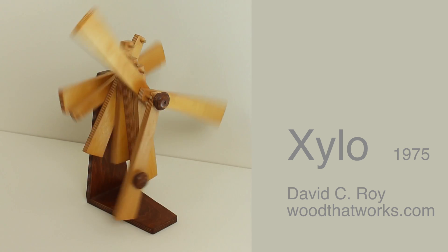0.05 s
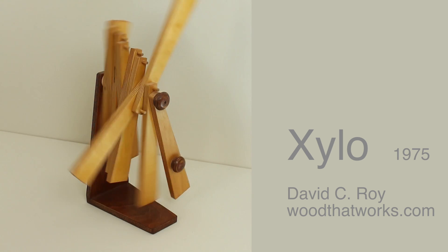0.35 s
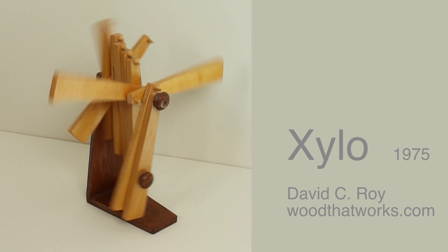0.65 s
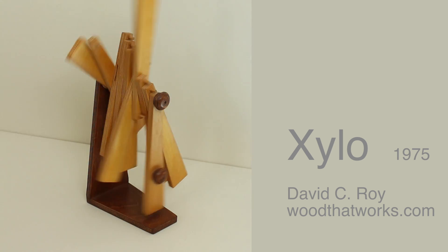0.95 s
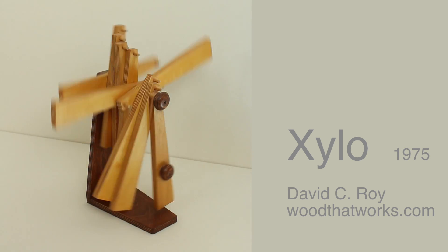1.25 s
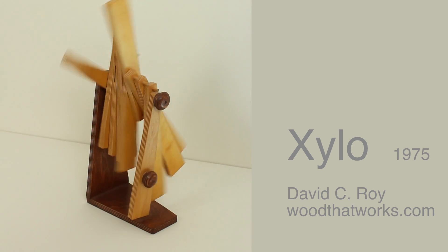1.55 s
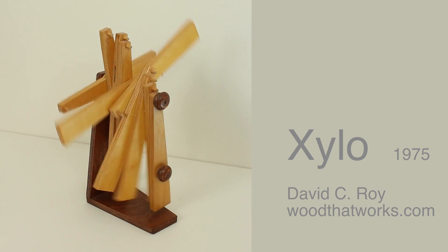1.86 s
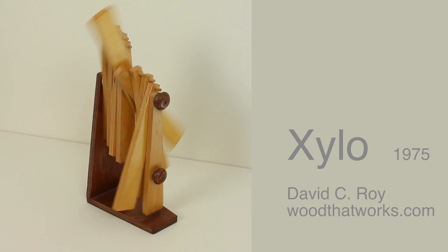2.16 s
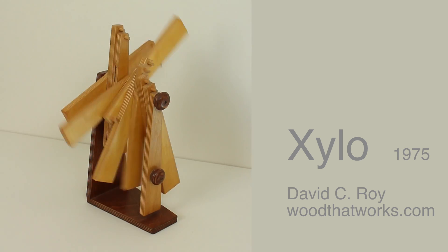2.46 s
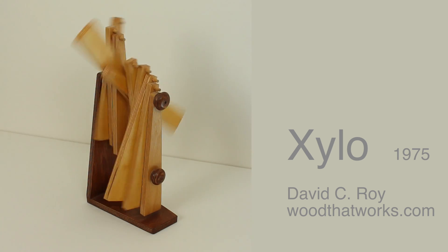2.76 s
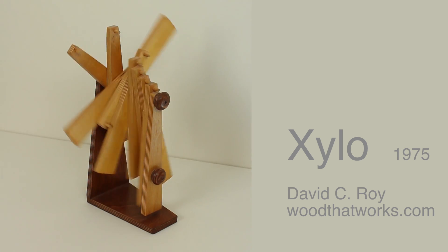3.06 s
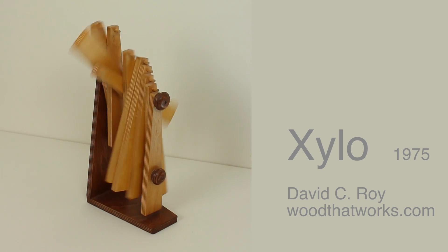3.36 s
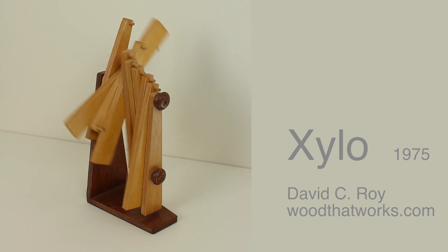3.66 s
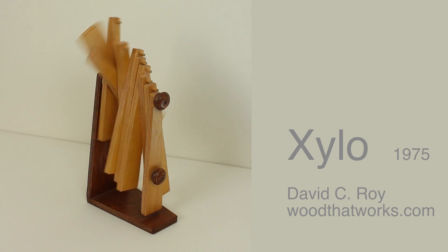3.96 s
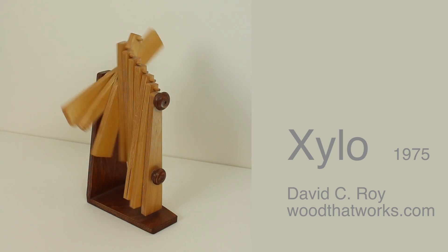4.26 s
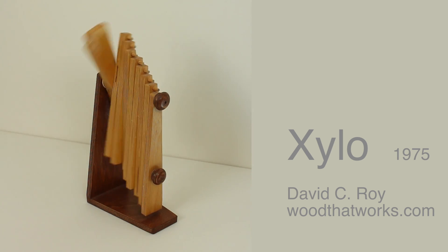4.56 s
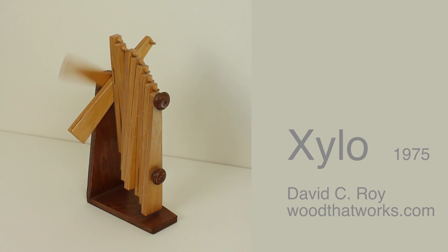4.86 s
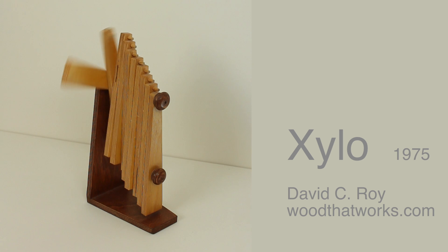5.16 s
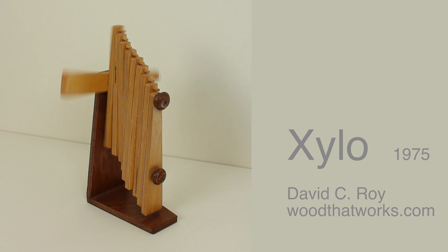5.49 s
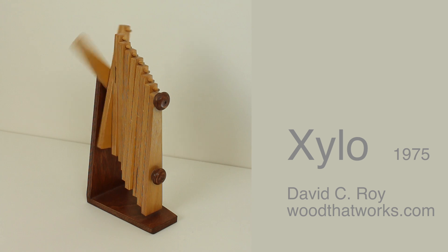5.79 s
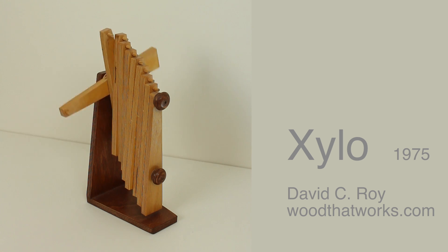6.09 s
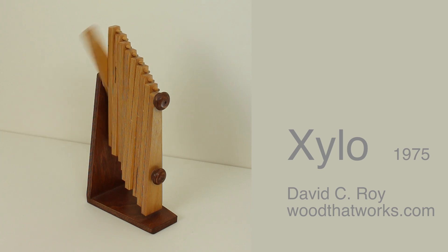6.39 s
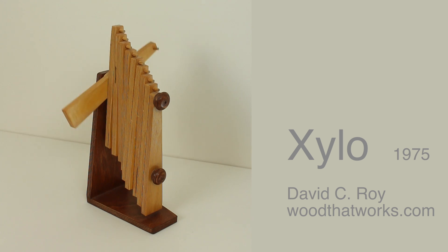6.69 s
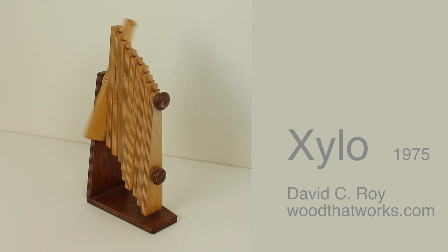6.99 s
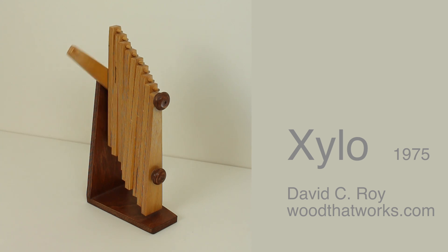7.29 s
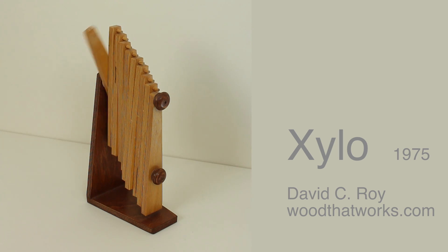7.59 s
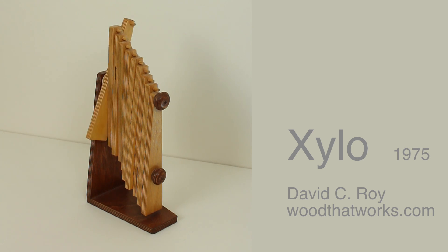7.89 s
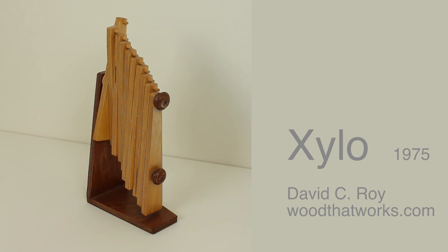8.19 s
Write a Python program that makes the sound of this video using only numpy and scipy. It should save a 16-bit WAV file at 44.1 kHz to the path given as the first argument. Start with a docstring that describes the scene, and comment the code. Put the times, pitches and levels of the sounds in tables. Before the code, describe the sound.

A brief low rumble and a sharp wooden clack sound at the start, as the slats of a desk toy swing on one axle. Hard, dry clacks follow unevenly, some doubled, at about 0.9, 1.0, 1.6, 2.2, 2.8, 3.5, 4.0 and 4.2 seconds, with a short woody ring and a small thump from the stand. Between them the slats tick lightly and rub past each other with brief, dry scrapes. A faint friction drone from the axle swells and fades between about 2.5 and 4 seconds. The last hard clack lands at 5.3 seconds. After that only small clusters of soft ticks and rubbing remain, near 5.7, 6.5, 7.1 and 7.7 seconds, getting weaker until the toy is almost still at around 8 seconds. The sound is close, in a small quiet room with short reverberation and a faint, steady ventilation hum.

```python
"""A brief low rumble and a sharp clack: a wooden desk toy is going, a row of slats swinging on one axle.
Each slat catches its neighbour, and the impact excites the damped modes of the wood and of the stand.
Between clacks the slats tick and rub by stick-slip friction, and for a while one drones on the axle.
One by one they come to rest, until the last only ticks.
A small quiet room reverberates, with a faint ventilation hum."""
import sys
import numpy as np
from scipy import signal
from scipy.fft import rfft, irfft, next_fast_len
from scipy.io import wavfile
from scipy.ndimage import uniform_filter1d, map_coordinates

SR = 44100
rng = np.random.default_rng(int(sys.argv[2]) if len(sys.argv) > 2 else 0)


def wav_out(sig):
    """Save sig, one row per channel (or a flat mono array), as 16-bit PCM at SR to the path in sys.argv[1]."""
    wavfile.write(sys.argv[1], SR, np.round(np.clip(np.atleast_2d(sig).T, -1, 1) * 32767).astype(np.int16))


N = 367794
CLOCK = np.arange(N) / SR
AGE = np.arange(SR // 4) / SR  # time since a contact

# Noise spectra: f/Hz, relative spectral density/dB
AIR_SPECTRUM = [(12, -27.5), (20, -10), (44, -6.5), (75, -20), (118, -9.5), (157, -8), (268, -12.5),
                (366, -8.5), (398, -7.5), (721, -15), (830, -9.5), (1540, -21.5), (2050, -25.5),
                (15600, -33), (17000, -46)]  # room air
HISS_SPECTRUM = [(400, 4), (1000, 8), (3000, 2), (7000, -8), (12000, -4), (16500, -13)]  # fast, smooth rubbing
SLIDE_SPECTRUM = [(710, -46), (1200, -18), (1580, -10.5), (1820, -15), (2270, -8.5), (2590, -13.5),
                  (3400, -18), (3840, -7.5), (4990, -13.5), (5700, -13.5), (8730, -25.5), (14600, -33),
                  (16500, -32)]  # dry sliding
WOOD_SPECTRUM = [(300, -68.5), (600, -12), (1050, 2), (1300, 0), (1650, 4.5), (2200, 2), (2800, 3.5),
                 (3300, -1), (4100, 4.5), (5200, -3), (7000, -7.5), (10000, -22.5)]  # dense, short-lived modes
CRACK_SPECTRUM = [(2500, -40.5), (5000, -7), (6400, -3), (7000, -4.5), (7600, 0), (8500, -8), (9800, 3),
                  (10500, -4), (11500, 4), (12200, -1), (13300, -0.5), (16500, -9)]  # contact noise
# Hum lines: f/Hz, level/dB, wavering/dB
HUM_LINES = [(127.2, -68.5, 0), (411, -69, 3.5), (880, -93, 2.5), (15735, -97.5, -0.5)]
# Reverberation time: f/Hz, T60/s
ROOM_DECAY = [(130, 0.48), (400, 0.26), (1000, 0.44), (2200, 0.52), (6000, 0.47), (15000, 0.31)]
# Build-up of the room modes, slowest in the bass: f/Hz, time constant/s
ROOM_BUILD_UP = [(150, 0.0365), (400, 0.0088), (1500, 0.0027)]
# Colour of the reverberation: f/Hz, relative level/dB
ROOM_COLOUR = [(70, -41.5), (150, -10.5), (300, -13.5), (700, -7.5), (2200, -14), (5000, -18), (14000, -22)]
# Normal modes: f/Hz, bandwidth/Hz, relative level/dB
STAND_MODES = [(145.8, 9.1, -12), (211, 34, -7.5), (320.5, 36.4, -4), (369, 13, -13), (404, 15, -3.5),
               (540, 60, 0.5), (656.4, 41, -4), (804, 99, 5.5), (1045, 170, 7)]  # the stand on its table
SLAT_MODES = [(1585, 47, -8), (1707, 31, -12), (1991, 22, -6.5), (2079, 21, -10), (2245, 10, -14.5),
              (2304, 34, -5), (3032, 82, -4.5), (3907, 150, 1.5), (4350, 145, -14.5), (4670, 30.6, -14.5),
              (5630, 260, 5), (6433, 130, -4), (7820, 320, -0.5), (13700, 440, -19)]  # bending of the slats
# Vigour of the swinging: t/s, relative level/dB
SWING_VIGOUR = [(0, 2.5), (0.6, -3), (1.1, -1.5), (1.7, -3), (2.15, 2), (2.45, -5), (4.3, -3.5),
                (5.9, -7.5), (6.7, -13), (8.3, -15.5)]
# One slat slides past its neighbour: t/s, duration/s, relative level/dB
SLAT_PASSES = [(0.32, .05, -49), (0.41, .07, -47), (0.7, .04, -58.5), (1.22, .08, -54), (1.33, .15, -48.5),
               (2.03, .11, -46), (2.52, .08, -48), (2.66, .16, -46), (3.17, .26, -46), (3.77, .1, -60),
               (3.958, 0.051, -40.5), (4.63, .11, -46.5), (4.95, .05, -53), (5.09, .1, -51),
               (5.65, .11, -65.5), (6.38, .18, -56), (6.97, .23, -54), (7.7, .15, -55)]
# Short dry scrapes: t/s, duration/s, centre f/Hz, level/dB
DRY_SCRAPES = [(1.224, 0.032, 2830, -47.5), (1.367, 0.02, 3000, -42.5), (1.403, 0.011, 13100, -51),
               (1.42, 0.0092, 12700, -46), (1.466, 0.0084, 3600, -42), (3.197, 0.034, 13200, -57),
               (5.684, .024, 13200, -54), (6.968, 0.019, 2650, -58.5)]
# Light touches: t/s, overall gain/dB, extra crack gain/dB, favoured mode f/Hz
LIGHT_TOUCHES = [(0.2024, -33.5, -24, 2090), (0.3352, -30.5, -9.5, 2260), (0.3494, -31.5, -14.5, 3020),
                 (0.3635, -29.5, -7, 3100), (0.4364, -36.5, -8, 2240), (0.7106, -30.5, -8, 2100),
                 (0.7204, -29, -9.5, 3860), (0.7262, -27, -22, 2160), (0.8056, -33, -5.5, 2010),
                 (0.8114, -31, -12.5, 2290), (1.2457, -38.5, -9, 2230), (1.279, -37, -6, 3220),
                 (1.292, -42, -13, 3280), (1.3702, -30, -13, 3050), (1.4037, -32.5, -10, 2280),
                 (1.4224, -34.5, -7, 1976), (1.4664, -36.5, -5, 1940), (2.1043, -38.5, -13, 1520),
                 (2.179, -32.5, -11, 2430), (2.529, -37, -20.5, 2220), (2.5701, -37.5, -21, 2220),
                 (2.9454, -39, 10, 2020), (3.0367, -42, -22.5, 1980), (3.204, -37, -10, 2222),
                 (3.8187, -44, -16.5, 2180), (3.984, -39, -19.5, 2360), (4.637, -32, -3, 2255),
                 (4.6395, -30.5, -11, 3020), (4.675, -38, -22, 5700), (4.6917, -33.5, 1, 2220),
                 (4.9785, -38.5, -8, 3960), (4.9904, -34, -6.5, 2170), (5.0876, -32.5, -12.5, 1980),
                 (5.0996, -33.5, -13, 3100), (5.136, -36.5, -19, 2260), (5.1642, -38, -17.5, 2210),
                 (5.1804, -34, -15, 2340), (5.6346, -39, -4, 2280), (5.6845, -31, -5, 3960),
                 (5.746, -35, -13, 3040), (6.408, -35, -12, 1935), (6.4702, -44.5, -7, 2170),
                 (6.4885, -31, -19, 1980), (6.5146, -32.5, -11.5, 3040), (6.52, -31, -20, 3960),
                 (7.028, -41, -16, 2050), (7.0374, -38, -18, 1600), (7.1052, -41, -10, 1910),
                 (7.1797, -42.5, -5.5, 1920), (7.6937, -42.5, -15.5, 1920), (7.7812, -38.5, -19, 1950)]
# Hard catches: t/s, overall gain/dB, favoured mode f/Hz, its gain/dB, thump gain/dB, thump f/Hz,
# crack gain/dB, long ring gain/dB; the gains of the parts add to the overall gain
HARD_CATCHES = [(0.1315, -19.5, 4910, -15, -17.5, 248, -11.5, -36),
                (0.8732, -22.5, 3590, -6, -35, 200, -7.5, -28.5),
                (0.8776, -16, 1665, -8.5, -24.5, 139, -26, -39),
                (0.988, -14, 2575, -13.5, -22.5, 205, -2, -15.5),
                (1.5524, -18.5, 2060, -14, -16, 296, -8, -15.5),
                (1.558, -26, 1012, -7.5, -4, 696, -25, -30), (1.6657, -29, 2290, -11, -29, 600, -19.5, -38),
                (2.2006, -21, 2250, -8, -13, 190, -1.5, -38), (2.2031, -18.5, 2050, -10, -16, 640, -6, -44),
                (2.212, -19.5, 2020, -8, -13.5, 597, -22, -39),
                (2.3255, -35, 2060, -20, -2.5, 190, -10, -27),
                (2.8369, -17.5, 2050, -9, -10.5, 180, -3.5, -31),
                (2.848, -21, 1740, -15, -13.5, 600, -9, -39), (3.2857, -36.5, 1900, -13, -3, 517, -28, -14),
                (3.4531, -15.5, 3900, -8, -14, 238, -4, -25),
                (4.0213, -14, 1997, -16.5, -15.5, 410, -2, -36),
                (4.228, -22, 1914, -11.5, -5, 256, -2, -45), (4.25, -39, 1960, -1, 8.5, 300, -16, -32),
                (5.266, -15, 2020, -12, -24, 304, -1, -27.5)]

TOP_HZ = 16900  # upper band limit


def amp(db):
    """Amplitude ratio of a level in decibels."""
    return 10 ** (np.asarray(db) / 20)


def unit(x):
    """Normalisation to rms 1."""
    return x / np.sqrt(np.mean(x ** 2) + 1e-20)


def blow(x):
    """Normalisation to the energy of 5 ms at rms 1."""
    return x * np.sqrt(.005 * SR / np.sum(x ** 2))


def along(points, hz):
    """Interpolation of (f/Hz, value) points on a logarithmic frequency axis."""
    f, values = np.transpose(points)
    return np.interp(np.log(hz + 1), np.log(f), values)


def filtered(x, response):
    """Linear filtering: the spectrum of x is multiplied by a frequency response."""
    size = next_fast_len(len(x) + 8192)
    return irfft(rfft(x, size) * response(np.fft.rfftfreq(size, 1 / SR)), size)[:len(x)]


def noise(spectrum, size):
    """Spectral shaping: coloured noise of rms 1."""
    return unit(filtered(rng.standard_normal(size), lambda hz: amp(along(spectrum, hz))))


def band(centre_hz, half_width_hz, size):
    """Resonance: noise of rms 1 in a single peak."""
    peak = lambda hz: 1 / (1 + ((hz - centre_hz) / half_width_hz) ** 2)
    return unit(filtered(rng.standard_normal(size), peak))


def wobble(knots_per_s):
    """Random modulation: a smooth curve through Gaussian knots."""
    knots = rng.standard_normal(int(N * knots_per_s / SR) + 4)
    return map_coordinates(knots, [np.arange(N) * knots_per_s / SR])


def add(track, s, sound):
    """Superposition of a sound on the track from time s."""
    part = track[max(round(s * SR), 0):][:len(sound)]
    part += sound[:len(part)]


def ring(modes, rise, detune, scatter_db):
    """Free vibration of damped modes; pitches and strengths vary with the slat and point of contact."""
    hz, width, db = np.transpose(modes)[:, :, None]
    pitch, size, phase = rng.standard_normal((3, len(modes), 1))
    waves = np.sin(2 * np.pi * (hz * (1 + detune * pitch) * AGE + phase)) * np.exp(-np.pi * width * AGE)
    return blow(np.sum(amp(db + scatter_db * size) * waves, axis=0) * (1 - np.exp(-AGE / rise)))


def burst(spectrum, rise, hold, t60, edge_hz=TOP_HZ):
    """Modal overlap: countless modes merge into noise, fed while the faces chatter, then decaying."""
    fade = amp(-60 * np.maximum(AGE - hold, 0) / t60)
    colour = lambda hz: amp(along(spectrum, hz)) / (1 + (hz / edge_hz) ** 20)
    return blow(filtered(rng.standard_normal(len(AGE)), colour) * fade * (1 - np.exp(-AGE / rise)))


def ventilation():
    """Broadband air noise and hum lines, which waver by amplitude and phase modulation."""
    hum = np.zeros(N)
    for hz, db, waver_db in HUM_LINES:
        strength = amp(waver_db * wobble(6.4))
        hum += amp(db) * unit(strength * np.sin(2 * np.pi * hz * CLOCK + 1.3 * wobble(5.7)))
    return hum + amp(-59.5) * noise(AIR_SPECTRUM, N)


def room(x, wall_delay_s=.047, wall_db=-2):
    """Reverberation: a diffuse field builds up and decays; the far wall reflects a second wave of it."""
    hz, t, field = signal.stft(rng.standard_normal(SR * 3 // 5), SR, nperseg=256)
    decay = amp(-60 * t / along(ROOM_DECAY, hz)[:, None])
    build_up = 1 - np.exp(-t / along(ROOM_BUILD_UP, hz)[:, None])
    envelope = decay * build_up * (1 + amp(wall_db) * (t > wall_delay_s))
    envelope /= np.sqrt(np.mean(envelope ** 2, axis=1, keepdims=True))
    tail = signal.istft(field * envelope * amp(along(ROOM_COLOUR, hz))[:, None], SR, nperseg=256)[1]
    return signal.fftconvolve(x, tail / np.sqrt(len(tail)))


def swing(exponent=1):
    """Power law: a gain that follows the vigour of the swinging."""
    s, db = np.transpose(SWING_VIGOUR)
    return amp(exponent * np.interp(CLOCK, s, db))


def shaking(rise_s=0.01, fall_db_per_s=57.5):
    """Energy summation: the envelope of the decaying vibration that the clacks leave in the toy."""
    power, t = np.zeros(N), CLOCK[:SR]
    shape = (1 - np.exp(-t / rise_s)) * amp(-fall_db_per_s * t)
    for s, db, *_ in HARD_CATCHES:
        add(power, s, (amp(db) * shape) ** 2)
    return np.sqrt(power)


def stand_rumble():
    """Forced vibration: the rolling axle, the clacks and the first push drive the stand's modes."""
    resonances = lambda f: sum(amp(db) / (1 + ((f - hz) / width) ** 2) for hz, width, db in STAND_MODES)
    tilt = lambda f: amp(along([(60, -0.5), (150, 17.5), (400, 8), (1000, -13.0)], f))
    rumble = unit(filtered(rng.standard_normal(N), lambda f: resonances(f) * tilt(f)))
    rolling = amp(-55) * swing(exponent=0.62)
    shaken = amp(-28.5) * shaking()
    first_push = amp(-42 - 80 * CLOCK)  # decays at 80 dB/s
    return amp(-4.5) * np.linalg.norm([rolling, shaken, first_push], axis=0) * rumble


def stand_bump(s=1.935, db=-45):
    """Damped low modes: one dull bump of the stand on its table."""
    out = np.zeros(N)
    low_modes = [(68.5, 17, -5), (104, 27, -3), (187, 21, 3.5)]
    add(out, s, amp(db) * ring(low_modes, rise=.005, detune=.01, scatter_db=5))
    return out


def axle_drone(start_s=2.45, end_s=3.97, drone_hz=965, width_hz=70, sag_hz_per_s=35):
    """Friction at the pivot excites a narrow resonance that swells, sags and fades as a slat slows."""
    age = np.clip(CLOCK - start_s, 0, end_s - start_s)
    swell = np.sqrt(np.abs(np.sin(np.pi * age / (end_s - start_s))))
    phase = 2 * np.pi * np.cumsum(drone_hz - sag_hz_per_s * age) / SR
    narrow_noise = wobble(2 * width_hz) * np.sin(phase) + wobble(2 * width_hz) * np.cos(phase)
    return amp(-57.5) * swell * unit(narrow_noise)


def passing(rise_s=0.004, fall_s=0.039):
    """Sliding contact: the gain of the friction rises, holds and falls as two faces meet and part."""
    gain, t = np.zeros(N), CLOCK[:SR]
    for s, length, db in SLAT_PASSES:
        add(gain, s, amp(db) * (1 - np.exp(-t / rise_s)) * np.exp(-np.maximum(t - length, 0) / fall_s))
    return gain


def impulses(per_s, spread_db, size):
    """Poisson process: impulses at random times, with log-normal strengths."""
    return (rng.random(size) < per_s / SR) * amp(spread_db * rng.standard_normal(size))


def grit(t60=0.015):
    """Shot noise: sparse snags of the grain, each a short rasp with a bright top."""
    snags = impulses(per_s=110, spread_db=8, size=N)
    flicker = signal.lfilter([1], [1, -np.exp(-np.log(1000) / (t60 * SR))], snags)
    bright_rasp = noise(SLIDE_SPECTRUM, N) + band(centre_hz=13200, half_width_hz=1900, size=N)
    return amp(-13.5) * unit(flicker * bright_rasp)


def rubbing(grip_db=3.0):
    """Stick-slip friction: tiny slips ring the slats and rasp; at speed they merge into a hiss."""
    slips = impulses(per_s=420, spread_db=3.5, size=N)
    slat_response = ring(SLAT_MODES, rise=0.00029, detune=0.0032, scatter_db=-2.0)
    grains = unit(signal.fftconvolve(slips, slat_response)[:N])
    rasp = unit(noise(SLIDE_SPECTRUM, N) * np.sqrt(np.abs(uniform_filter1d(slips, size=300))))
    overlap = passing()
    effort = np.sqrt((amp(-51) * swing()) ** 2 + overlap ** 2 + (amp(-24) * shaking()) ** 2)
    friction = amp(grip_db * wobble(22)) * effort * (amp(-13.5) * grains + amp(-15.5) * rasp)
    crackle = overlap * grit()
    hiss = amp(-58.5) * swing(exponent=2) * noise(HISS_SPECTRUM, N)
    return friction + crackle + hiss


def scrapes(half_width_hz=420):
    """Band-limited friction noise: one slat rasps briefly on the next."""
    out = np.zeros(N)
    for s, length, centre_hz, db in DRY_SCRAPES:
        stroke = np.sin(np.pi * np.minimum(AGE / length, 1))
        add(out, s, amp(db) * stroke * band(centre_hz, half_width_hz, len(AGE)))
    return out + amp(6.5) * room(out)[:N]


def chatter(per_s=6.7, above_pass_db=5, spread_db=5, crack_db=-9):
    """Intermittent contact: tiny touches, at least one a pass, each favouring one slat mode."""
    touches = []
    for s, length, db in SLAT_PASSES:
        for when, size, mode in rng.random((int(np.ceil(length * per_s)), 3)):
            strength_db = db + above_pass_db + spread_db * (2 * size - 1)
            mode_hz = SLAT_MODES[int(mode * len(SLAT_MODES))][0]
            touches.append((s + when * length, strength_db, crack_db, mode_hz))
    return touches


def drag(decay_s=0.043):
    """Stick-slip after a touch: the faces skip in an uneven, fading impulse train of unit energy."""
    slips = impulses(per_s=260, spread_db=4, size=len(AGE))
    slips = slips * rng.choice([-1, 1], len(AGE)) * np.exp(-AGE / decay_s)
    return slips / (np.linalg.norm(slips) + 1e-9)


def ticks(mode_width_hz=65, drag_db=-5.5):
    """Weak impacts: loose slats touch and drag on; their modes ring while the stand stays still."""
    out = np.zeros(N)
    for s, db, crack_db, mode_hz in LIGHT_TOUCHES + chatter():
        wood = amp(-11.5) * ring(SLAT_MODES, rise=0.00012, detune=0.0087, scatter_db=1)
        wood += amp(-12.5) * ring([(mode_hz, mode_width_hz, 0)], rise=.0028, detune=.0018, scatter_db=0)
        wood += amp(-17.0) * burst(WOOD_SPECTRUM, rise=0.00017, hold=0.00117, t60=0.013)
        crack = amp(crack_db - 12.5) * burst(CRACK_SPECTRUM, rise=0.0001965, hold=0.00057, t60=0.017)
        slips = signal.fftconvolve(wood + amp(-2.5) * crack, drag())[:len(AGE)]
        add(out, s, amp(db) * (wood + crack + amp(drag_db) * slips))
    return out + amp(-11.5) * room(out)[:N]


def stand_thump(centre_hz, focus_db=3.0):
    """Impulse excitation: the duration of the push favours the stand's modes near one frequency."""
    favoured = [(hz, width, db - focus_db * np.log2(hz / centre_hz) ** 2)
                for hz, width, db in STAND_MODES]
    return ring(favoured, rise=0.00078, detune=0.024, scatter_db=5)


def clacks(ring_hz=680, ring_width_hz=11, mode_width_hz=70, graze_lead_s=0.0057):
    """Hard impacts: a slat grazes, then catches the next, with a crack, ringing wood and a thump."""
    out = np.zeros(N)
    bass_cut = signal.butter(4, 115, 'high', fs=SR, output='sos')  # the clacks carry no deep bass
    for s, db, mode_hz, mode_db, thump_db, thump_hz, crack_db, ring_db in HARD_CATCHES:
        wood = amp(-7) * burst(WOOD_SPECTRUM, rise=0.00034, hold=0.0058, t60=0.042)
        wood += amp(-10.5) * ring(SLAT_MODES, rise=.0006, detune=0.019, scatter_db=2.5)
        wood += amp(mode_db) * ring([(mode_hz, mode_width_hz, 0)], rise=.0008, detune=.0012, scatter_db=0)
        edge_hz = 19100 + 173 * (db + crack_db)  # softer cracks are duller
        crack = burst(CRACK_SPECTRUM, rise=0.00016, hold=0.001, t60=0.019, edge_hz=edge_hz)
        thump = stand_thump(thump_hz)
        long_ring = ring([(ring_hz, ring_width_hz, 0)], rise=.002, detune=0.0067, scatter_db=0)
        body = wood + amp(crack_db - 2.5) * crack + amp(thump_db + 2.5) * thump + amp(ring_db) * long_ring
        hit = amp(db) * signal.sosfilt(bass_cut, body)
        graze = amp(db - 27.5) * burst(WOOD_SPECTRUM, rise=0.000494, hold=0.00427, t60=0.032)
        add(out, s - graze_lead_s, graze)
        add(out, s, hit)
        add(out, s, amp(4.5) * room(hit))
    return out


def scene():
    """Superposition of the toy and its room, in one channel."""
    slats = clacks() + ticks() + scrapes() + rubbing()
    return (slats + axle_drone() + stand_rumble() + stand_bump() + ventilation())[None]


def record(dry):
    """Band limiting: an ideal low-pass filter passes nothing above TOP_HZ."""
    return np.array([filtered(channel, lambda hz: hz < TOP_HZ) for channel in dry])


dry = scene()
out = record(dry)
wav_out(out)
```